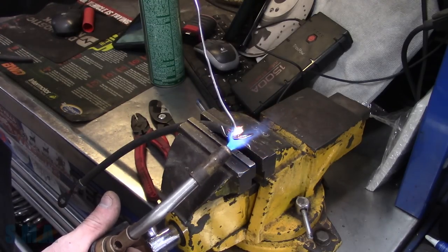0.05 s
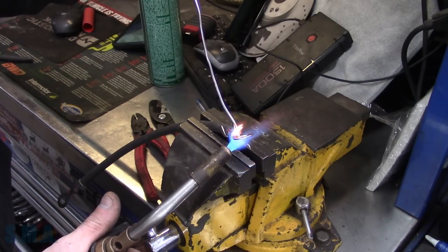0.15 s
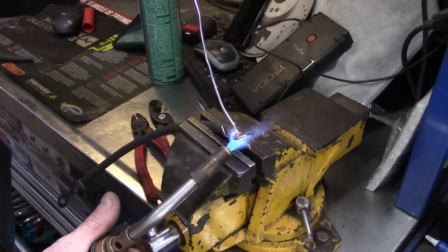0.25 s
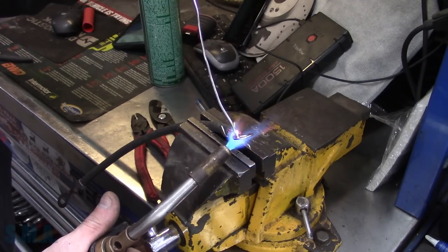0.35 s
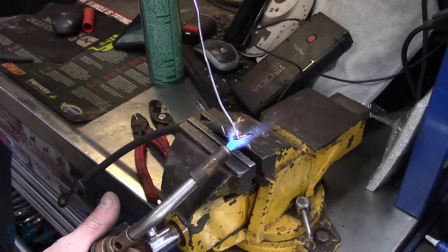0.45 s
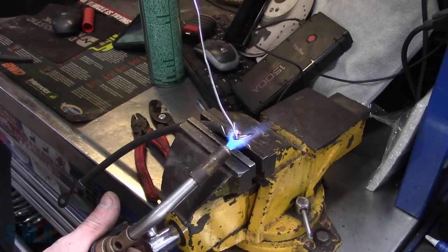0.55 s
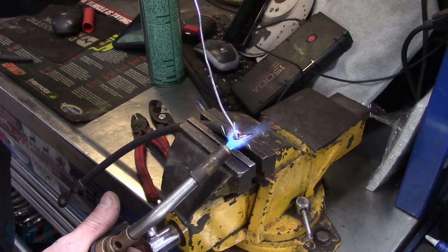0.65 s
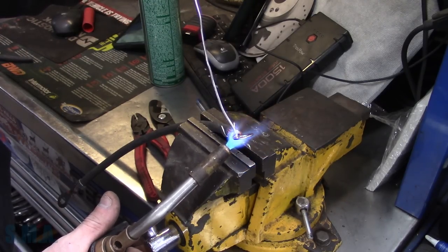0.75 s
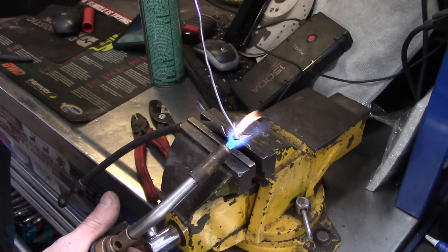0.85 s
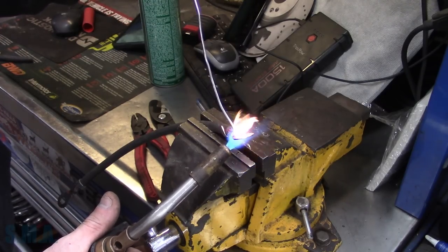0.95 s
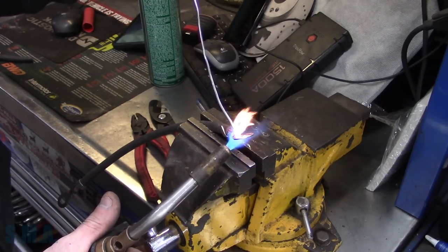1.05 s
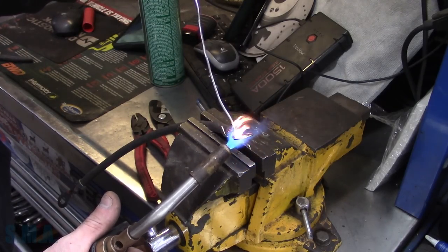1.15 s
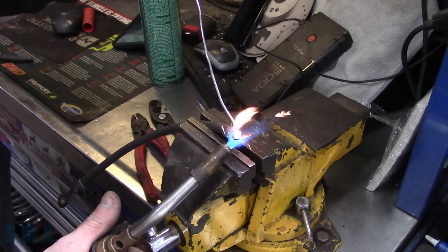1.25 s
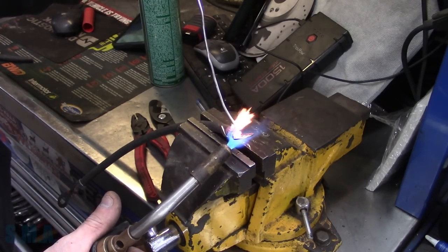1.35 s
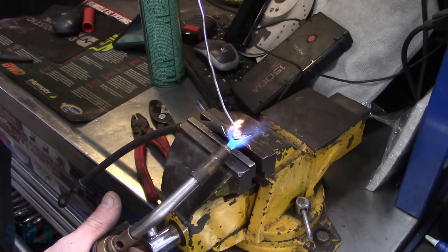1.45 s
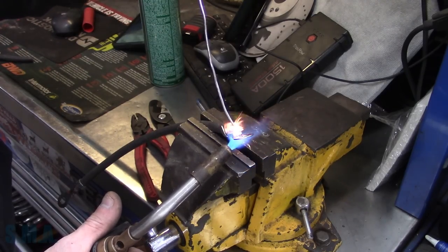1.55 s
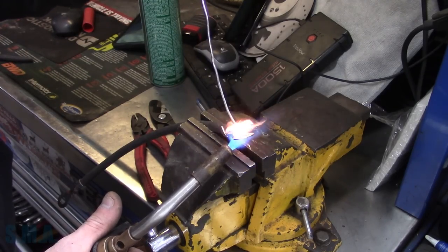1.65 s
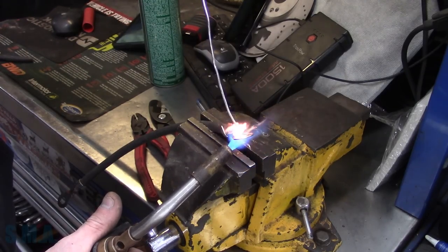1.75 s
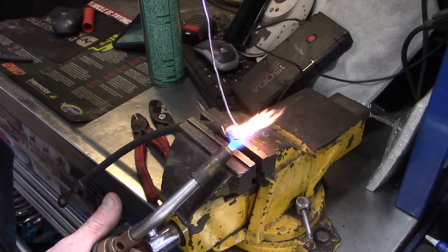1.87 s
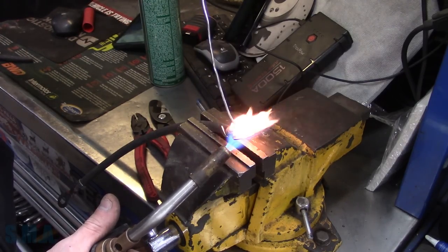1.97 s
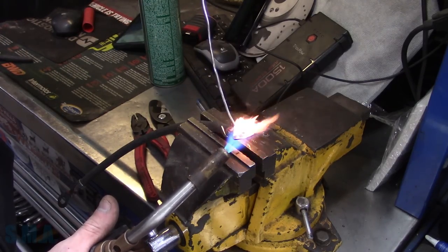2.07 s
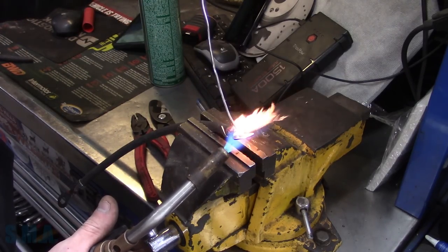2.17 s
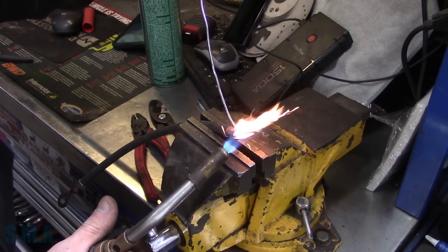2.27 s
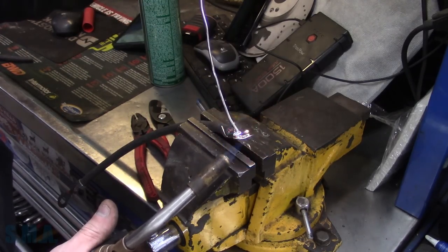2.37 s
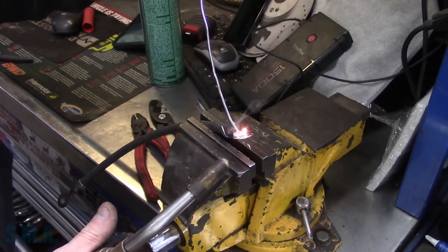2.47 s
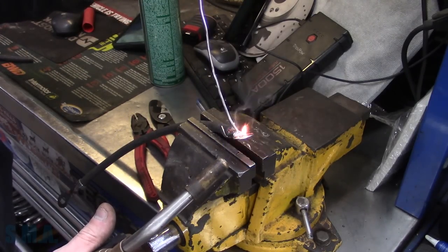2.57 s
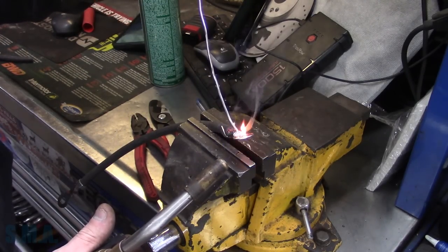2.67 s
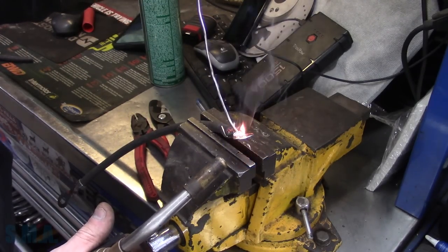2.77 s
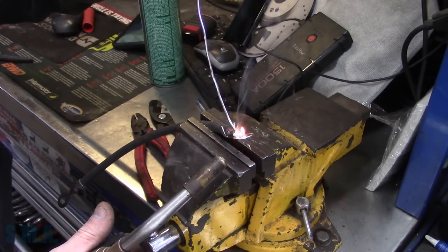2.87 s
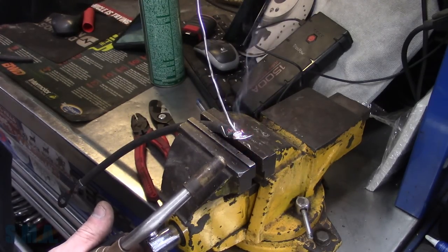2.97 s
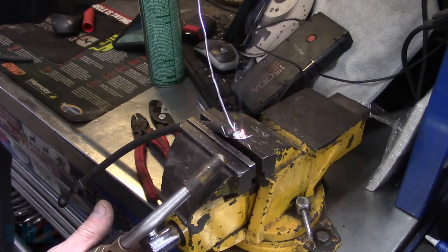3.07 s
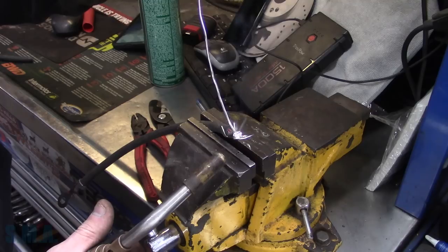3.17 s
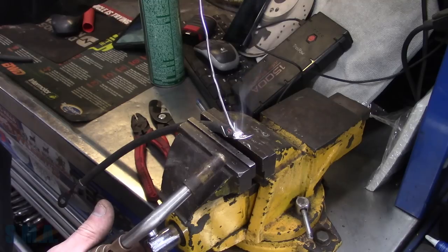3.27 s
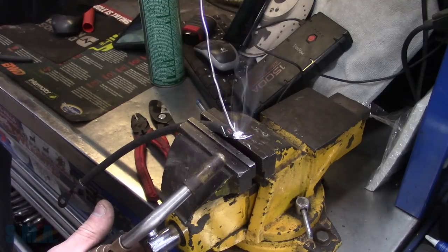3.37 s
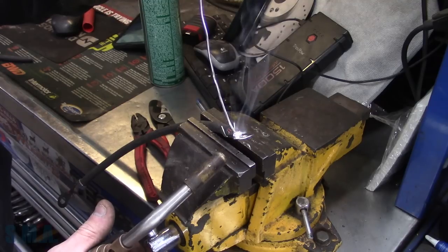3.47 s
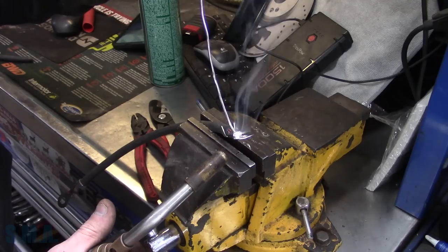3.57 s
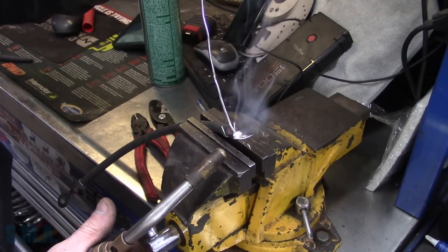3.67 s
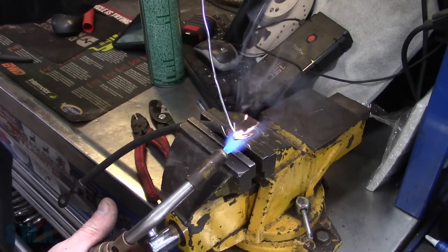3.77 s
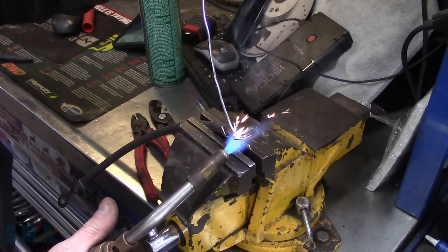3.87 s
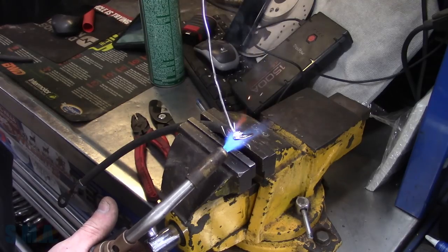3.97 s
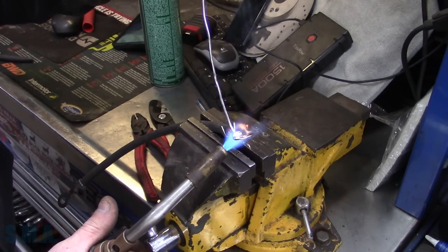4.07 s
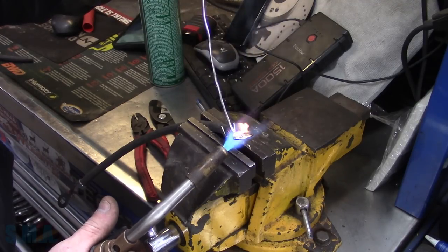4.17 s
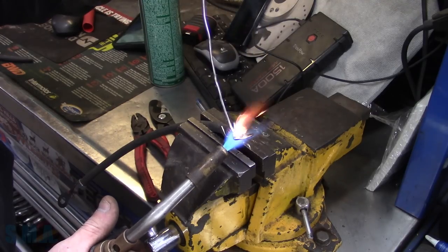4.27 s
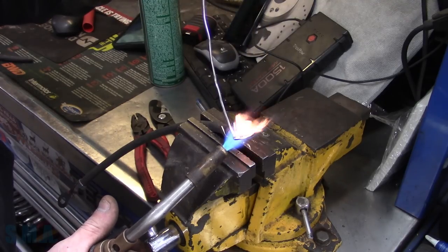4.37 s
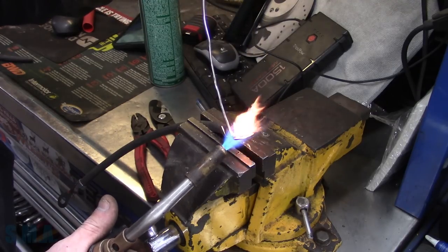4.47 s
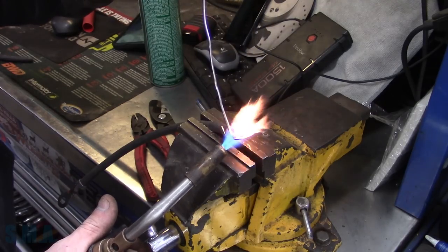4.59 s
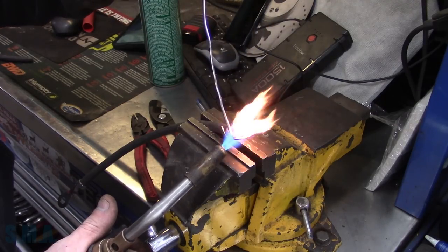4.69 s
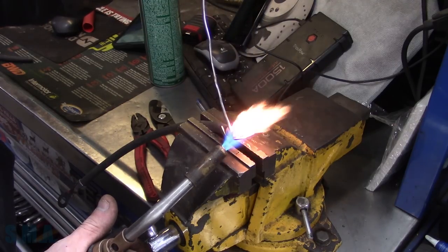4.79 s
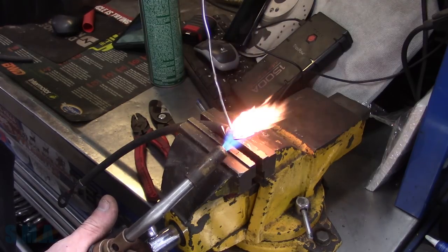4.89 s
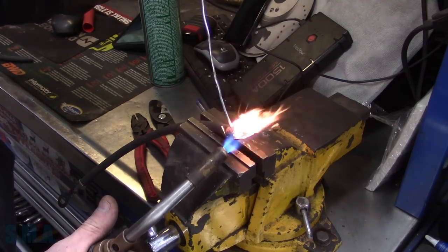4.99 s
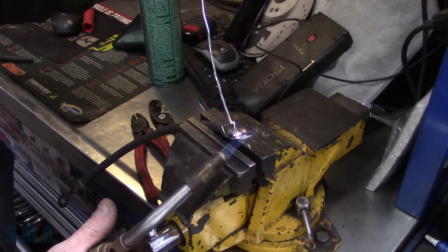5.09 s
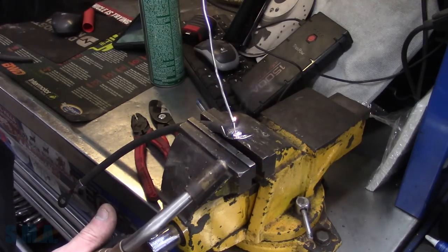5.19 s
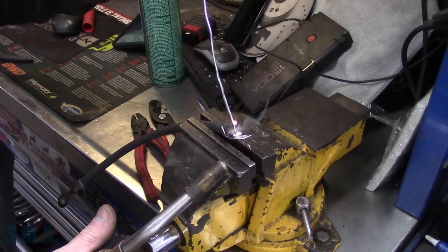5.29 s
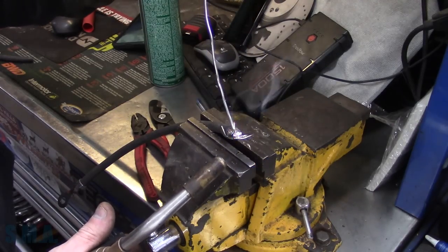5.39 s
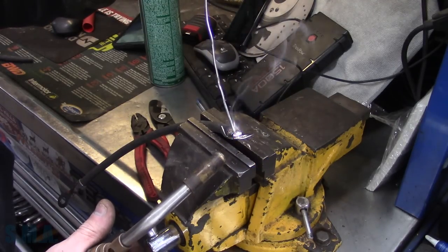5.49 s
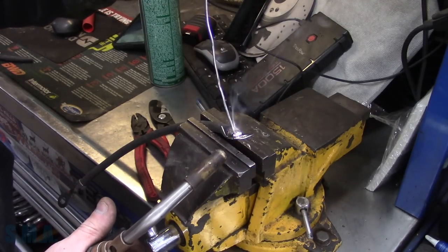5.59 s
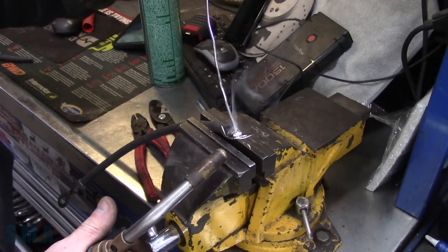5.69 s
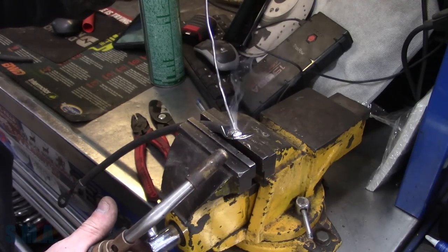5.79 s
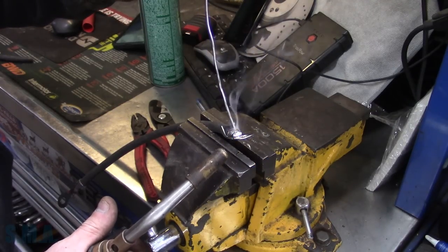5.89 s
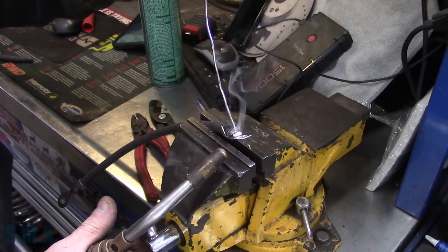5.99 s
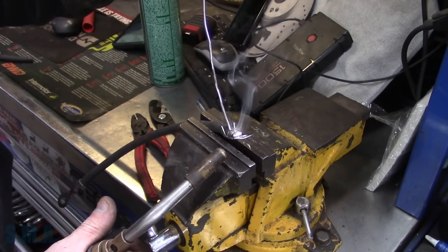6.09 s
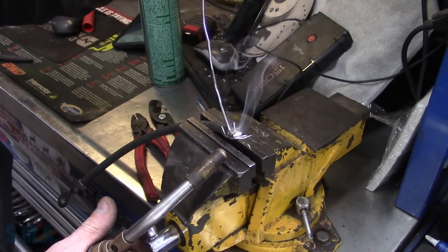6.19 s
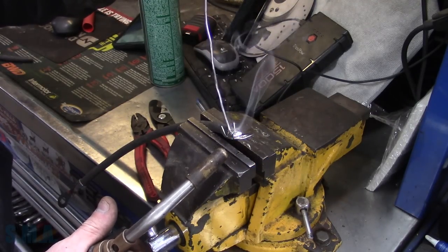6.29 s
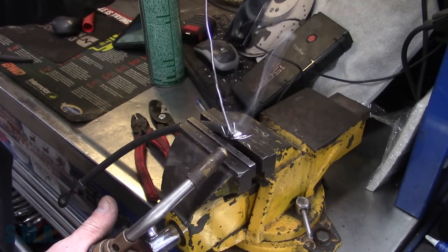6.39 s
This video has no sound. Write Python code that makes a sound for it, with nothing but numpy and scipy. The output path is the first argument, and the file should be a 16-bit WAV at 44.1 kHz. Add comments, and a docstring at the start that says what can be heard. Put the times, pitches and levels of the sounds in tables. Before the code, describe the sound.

A gas hand torch is already burning, close and centred, with a steady, turbulent midrange roar and a hissing rush above it. At about 2.3 seconds it cuts off with a very brief, hollow hoot that rings shortly in the workshop. In the pause, hot flux gives faint, high spits and a fine sizzle, busiest around 3 seconds, with a few barely audible bumps. At 3.6 seconds gas hisses through the tube, and just after 3.7 a sharp igniter snap and a small thump relight the flame. It roars as loudly as before until 5 seconds, then dies with a second, slightly higher hoot. Sparse, tiny crackles follow from 5.3 to 6.1 seconds, then two soft, low bumps. At about 6.4 seconds unlit gas briefly hisses again as the sound ends. A faint hum and dull room noise lie underneath throughout.

```python
"""At a workshop bench, a gas hand torch heats a wire joint held in a vice, in two burns.
The turbulent flame is already roaring; on release it shrinks into the burner tube and hoots.
Gas hisses through the tube, a piezo snap relights it with a thump, and it roars and hoots again.
Bubbles of hot flux crackle in the pauses, and at the end the gas opens once more, unlit.
The room reverberates over a faint hum and a few soft bumps."""
import sys
import numpy as np
from scipy import signal
from scipy.fft import rfft, irfft, next_fast_len
from scipy.io import wavfile

SR = 44100
rng = np.random.default_rng(int(sys.argv[2]) if len(sys.argv) > 2 else 0)


def store_wav(level_fs):
    """Save 16-bit WAV to argv[1]."""
    pcm = np.round(np.clip(np.atleast_2d(level_fs), -1, 1) * 32767)
    wavfile.write(sys.argv[1], SR, pcm.T.astype(np.int16))


N = 284004
TIME = np.arange(N) / SR


def flame(flutter_db=0.72, surge_db=0.44, split_hz=1000, room_colour=0.42):
    """Combustion noise: turbulence radiates a roar and a higher rush. Returns direct sound and room feed."""
    # burns: lit_s, collapse_s, gas_spent_s, roar_db, rush_db
    burns = [(-0.1, 2.262, 2.267, -17, -19), (3.739, 4.992, 5.014, -17.5, -19)]
    # spectrum of the turbulence: frequency_hz, relative_db
    turbulence = [(40, -34), (80, -27), (140, -19.5), (220, -10), (450, -1), (750, 0.5), (1100, -8),
                  (2200, -9.5), (4700, -22), (8500, -29), (12000, -34.5), (15700, -49)]
    # peaks and dips of tube, vice and bench, set by the aim: centre_hz, width_hz, burn_1_db, burn_2_db
    colour = [(149, 26, 5.5, 5), (271, 98, 7.5, 8.0), (342, 52, -5.5, -7), (467, 69, -6.5, -6),
              (552, 14, -4.5, -12.5), (626, 27, -6.5, -3), (752, 15, -15.5, -4.5), (817, 82, 2.5, 4),
              (1002, 24, 5.5, 3.5), (1252, 70, 4.5, 5.5), (1307, 22, -4.5, -8), (1550, 17, 0, -10),
              (1792, 21, -8, -7), (2210, 440, -5, -5.5), (2270, 42, -10.5, -15), (2570, 46, 4.5, 1),
              (2740, 62, -10.5, -3.5), (3177, 155, -7.5, -6.5), (3533, 277, 6, 2), (3850, 66, -6, 2.5),
              (4197, 62, 5.5, 6.5), (4380, 44, 9, 9), (4515, 720, -4.5, -5.5), (5260, 71, 2, -12),
              (6070, 222, 5.5, 5.5), (6862, 473, 8.5, 7), (7800, 140, 3.5, 6), (11770, 417, -3, 0.5),
              (12730, 520, -8, -3.5), (14220, 1400, 7, 6.5)]
    low_pass = signal.butter(2, split_hz, fs=SR, output="sos")
    out = np.zeros((2, N))
    for burn, (lit, collapse, spent, roar_db, rush_db) in enumerate(burns):
        near = noise(turbulence, [(hz, width, db[burn]) for hz, width, *db in colour])
        # summed over all directions, the peaks and dips mostly even out
        around = noise(turbulence, [(hz, width, room_colour * db[burn]) for hz, width, *db in colour])
        eddies = np.array([near, around])
        low = signal.sosfiltfilt(low_pass, eddies)
        roar = rms_one(low) * from_db(roar_db + surge_db * drift(rate_hz=22))
        rush = rms_one(eddies - low) * from_db(rush_db)
        out += roar * gate(lit, collapse, rise_s=0.009, fall_s=0.0063)
        out += rush * gate(lit, spent, rise_s=0.034, fall_s=0.017)
    return out * from_db(flutter_db * drift(rate_hz=50))


def hoot(base_hz=840, waver=0.0178, unsteady_db=3.0, lead_s=0.0045):
    """Thermoacoustic oscillation: as pressure falls, the flame locks onto the tube's lowest mode."""
    # arches of pitch from the dying flame: top_s, top_pitch_hz, level_db
    hoots = [(2.264, 984, -15), (5.008, 1035, -14)]
    out = np.zeros(N)
    for top_s, top_hz, db in hoots:
        hz = base_hz + (top_hz - base_hz) * swell(top_s, 0.027)
        phase = 2 * np.pi * np.cumsum(hz * (1 + waver * drift(rate_hz=300))) / SR
        level = from_db(db + unsteady_db * drift(rate_hz=150)) * swell(top_s - lead_s, 0.031)
        out += np.sqrt(2) * np.sin(phase) * level
    return out


def unlit_gas():
    """Jet noise: the hiss of bare gas is filtered by the resonances of the cold tube."""
    # valve openings: start_s, stop_s, rise_s, level_db
    openings = [(3.617, 3.744, 0.024, -31), (6.367, 6.5, 0.034, -33)]
    # spectrum of the jet: frequency_hz, relative_db
    jet = [(200, -25.5), (700, -22.5), (1500, -19), (2800, -22.5), (4200, -13.5), (5200, -20.5),
           (6300, -10), (7600, -11.5), (8600, -18.5), (12000, -24), (15500, -30)]
    # tube resonances: centre_hz, width_hz, gain_db
    resonances = [(1000, 420, 17), (2170, 280, 11.5), (3385, 260, 11.5), (4490, 320, 6), (5820, 280, 8),
                  (6520, 390, 13), (7597, 330, 9.5), (9080, 280, 7.5), (10050, 300, 4.5), (11260, 350, 8),
                  (12070, 350, 6.5)]
    flow = sum(from_db(db) * gate(start, stop, rise, fall_s=0.0037) for start, stop, rise, db in openings)
    return flow * noise(jet, resonances)


def piezo_snap(crack_db=-7, scatter_db=-25, top_hz=10000):
    """Impact excitation: the hammer rings the igniter's modes, and its crack scatters off the bench."""
    # hammer blows: time_s, relative_db
    snaps = [(3.7351, 2.5), (3.7362, -10), (3.7371, -3.5)]
    # igniter modes: pitch_hz, gain_db, t60_s
    modes = [(1444, -10, 0.0084), (3730, -9, 0.0068), (4700, -14, 0.007), (6900, -17.5, 0.008),
             (8900, -18, 0.007), (10410, -7.5, 0.0082), (14000, -21.5, 0.005)]
    blows = clicks(snaps)
    crack = from_db(crack_db) * bursts(blows, decay_s=0.00068)
    scatter = from_db(scatter_db) * bursts(blows, decay_s=0.0095)
    low_pass = signal.butter(2, top_hz, fs=SR, output="sos")
    return ring(blows, modes) + signal.sosfilt(low_pass, crack + scatter)


def gas_thump(low_hz=110):
    """Sudden expansion: gas catches at the nozzle; so small a source radiates little deep bass."""
    # pops, on relighting and faintly after each burn: time_s, relative_db
    pops = [(2.617, -36), (3.7396, 1.5), (5.3343, -25)]
    # modes of a pop: pitch_hz, gain_db, t60_s
    modes = [(280, -5.5, 0.078), (480, -1.5, 0.0066), (850, -9.5, 0.01), (2320, -13.5, 0.0054)]
    high_pass = signal.butter(2, low_hz, "high", fs=SR, output="sos")
    return signal.sosfilt(high_pass, ring(clicks(pops), modes))


def flux(spit_db=-5.5, sizzle_db=-61, spread_db=3.0, rest_per_s=5):
    """Shot noise: tiny flux bubbles burst at random on the hot joint, among a few louder spits."""
    # spits: time_s, relative_db
    spits = [(2.4703, -43), (2.5346, -41), (2.609, -46), (2.6424, -49), (2.7911, -47), (2.8918, -49.5),
             (2.9667, -49), (3.0194, -46), (3.0435, -50), (3.2465, -59), (3.3253, -50), (3.4414, -56),
             (5.2505, -43), (5.3338, -42), (5.5348, -46.5), (5.5618, -51.5), (5.5857, -53.5), (6.0467, -49),
             (6.099, -48.5)]
    # sizzle as the joint settles after the first burn: busiest_s, half_width_s, extra_per_s
    sizzle = (3.05, 0.4, 150)
    # spectrum of a burst: frequency_hz, gain_db
    spectrum = [(1500, -28), (4000, -18.5), (6600, 3), (7800, 2), (9000, 4.5), (11000, 1.5), (13000, -10),
                (16000, -12)]
    busiest_s, half_width_s, extra_per_s = sizzle
    per_s = rest_per_s + extra_per_s * swell(busiest_s, half_width_s)
    bubbles = (rng.random(N) < per_s / SR) * from_db(sizzle_db + spread_db * rng.standard_normal(N))
    blows = from_db(spit_db) * clicks(spits) + bubbles
    return coloured(bursts(blows, decay_s=0.0011), spectrum)


def with_echo(x, delay_s=0.01144, echo_db=-18.5, top_hz=4000):
    """Comb filtering: one dull reflection from a near surface ripples the direct sound's spectrum."""
    dull = signal.sosfiltfilt(signal.butter(1, top_hz, fs=SR, output="sos"), x)
    return x + from_db(echo_db) * np.interp(TIME - delay_s, TIME, dull, left=0)


def reverberation(x, first_echo_s=0.0066):
    """Diffuse field: dense echoes decay exponentially in octave bands, the treble dying first."""
    # decay of the workshop: frequency_hz, t60_s
    decay_times = [(150, 1.07), (400, 0.57), (1000, 1.0), (2800, 0.72), (7000, 0.65), (15000, 0.2)]
    # strength of its reverberation: frequency_hz, gain_db
    gains = [(100, -15), (300, -12.5), (800, -9), (2000, -12.5), (7000, -17.5), (15000, -25)]
    t, hz = TIME[:SR], np.arange(SR // 2 + 1.0)
    echoes, response = rfft(rng.standard_normal(SR)), np.zeros(SR)
    for centre in 62.5 * 2 ** np.arange(9):
        share = np.clip(1 - np.abs(np.log2((hz + 1) / centre)), 0, 1)
        fade = np.exp(-np.log(1000) * t / at_hz(decay_times, centre)) * (t > first_echo_s)
        fade /= np.sqrt(np.sum(fade ** 2))
        response += irfft(echoes * share, SR) * fade * from_db(at_hz(gains, centre))
    return signal.fftconvolve(x, response)[:N]


def bumps():
    """Amplitude modulation: low noise swells softly, as of a hand shifting on the bench."""
    # bumps: time_s, half_width_s, level_db
    swells = [(2.933, 0.0061, -58), (3.005, 0.0063, -55.5), (3.376, 0.0082, -55), (6.13, 0.0256, -52),
              (6.228, 0.045, -52)]
    # spectrum of a bump: frequency_hz, relative_db
    spectrum = [(60, -30.5), (140, -21), (200, -2.5), (270, -4), (380, -21), (800, -22), (4000, -47)]
    return noise(spectrum) * sum(from_db(db) * swell(s, width) for s, width, db in swells)


def hum(wander_rad=0.4):
    """Line spectrum: mains hum and faint steady tones, each wandering in phase."""
    # tones of the workshop: pitch_hz, rms_db
    tones = [(119, -66), (479, -77), (1590, -76.5)]
    return sum(from_db(db) * np.sqrt(2) * np.sin(2 * np.pi * hz * TIME + wander_rad * drift(rate_hz=9.7))
               for hz, db in tones)


def room_noise(level_db=-56):
    """Stationary noise: the dull, steady floor of the workshop."""
    # ambient spectrum: frequency_hz, relative_db
    spectrum = [(25, 2.5), (60, -14), (100, -9), (190, -4), (265, 2), (340, -4), (470, -2), (580, -6.5),
                (760, -5.5), (1100, -11.5), (1900, -15), (4500, -20.5), (8800, -28), (16000, -35)]
    return from_db(level_db) * noise(spectrum)


def from_db(db):
    """Decibels to amplitude ratio."""
    return 10 ** (np.asarray(db) / 20)


def rms_one(x):
    """Normalisation to rms 1."""
    return x / np.sqrt(np.mean(x ** 2) + 1e-20)


def at_hz(points, hz):
    """Interpolation on a log-frequency axis."""
    knots, values = np.transpose(points)
    return np.interp(np.log(hz + 1), np.log(knots), values)


def coloured(x, spectrum, peaks=()):
    """Spectral shaping by a broad curve with bell-shaped peaks and dips on it."""
    size = next_fast_len(N + SR // 10)
    hz = np.arange(0, SR / 2, 2.0)
    peaks_db = sum(db * np.exp(-2 * ((hz - centre) / width) ** 2) for centre, width, db in peaks)
    gain = np.interp(np.arange(size // 2 + 1) * SR / size, hz, from_db(at_hz(spectrum, hz) + peaks_db))
    return irfft(rfft(x, size) * gain, size)[:N]


def noise(spectrum, peaks=()):
    """Coloured Gaussian noise of rms 1."""
    return rms_one(coloured(rng.standard_normal(N), spectrum, peaks))


def drift(rate_hz):
    """Random modulation: straight lines between Gaussian values of spread 1."""
    knots = rng.standard_normal(N // 40)
    return np.interp(TIME * rate_hz, np.arange(len(knots)), knots)


def clicks(rows):
    """One impulse for each row of time_s, level_db."""
    out = np.zeros(N)
    for s, db in rows:
        out[int(round(s * SR))] += from_db(db)
    return out


def ring(blows, modes):
    """Modal superposition: each blow sets all modes ringing as damped sines."""
    out = np.zeros(N)
    for hz, db, t60 in modes:
        radius, angle = from_db(-60 / (t60 * SR)), 2 * np.pi * hz / SR
        feedback = [1, -2 * radius * np.cos(angle), radius * radius]
        out += from_db(db) * signal.lfilter([0, np.sin(angle)], feedback, blows + 1e-18)
    return out


def bursts(blows, decay_s):
    """Each blow releases an exponentially decaying puff of white noise."""
    pole = np.exp(-1 / (decay_s * SR))
    return signal.lfilter([1], [1, -pole], blows + 1e-18) * rng.standard_normal(N)


def gate(start_s, stop_s, rise_s, fall_s):
    """Envelope with a smooth rise, a hold and an exponential fall."""
    rise = np.sin(np.pi / 2 * np.clip((TIME - start_s) / rise_s, 0, 1))
    return rise * np.exp(-np.clip((TIME - stop_s) / fall_s, 0, 20))


def swell(centre_s, half_width_s):
    """Gaussian envelope of height 1."""
    return np.exp(-((TIME - centre_s) / half_width_s) ** 2)


def scene(ambience_side_db=-9.0, tube_to_room_db=-4.0):
    """Mid-side stereo: the torch is straight ahead and narrow; reverberation and room noise are wider."""
    # stereo width of the flame: frequency_hz, side_db
    flame_width = [(40, -18), (100, -31.5), (250, -40), (700, -45), (1500, -37), (2500, -38), (5000, -26.5),
                   (9000, -32.5), (15000, -30)]
    # stereo width of the reverberation: frequency_hz, side_db
    room_width = [(60, -11.5), (200, -24.5), (400, -24), (700, -35), (1300, -23), (2400, -23.5),
                  (4400, -14.5), (8000, -6.5), (15000, -19)]
    flame_near, flame_around = flame()
    tube = hoot() + unlit_gas()
    transients = piezo_snap() + gas_thump() + flux()
    direct = with_echo(flame_near) + tube + transients
    radiated = flame_around + from_db(tube_to_room_db) * tube + transients
    mid = direct + reverberation(radiated) + room_noise() + hum() + bumps()
    side = coloured(flame_around, flame_width) + coloured(reverberation(radiated), room_width)
    side += from_db(ambience_side_db) * room_noise()
    return np.array([mid + side, mid - side])


def record(dry, low_hz=75, top_hz=15700, ceiling=0.82):
    """Band limiting and saturation: the microphone drops deep bass, peaks are rounded, the top is cut."""
    thin = signal.sosfilt(signal.butter(3, low_hz, "high", fs=SR, output="sos"), dry)
    rounded = thin / (1 + (thin / ceiling) ** 8) ** (1 / 8)
    return signal.sosfilt(signal.ellip(10, 0.1, 80, top_hz, fs=SR, output="sos"), rounded)


dry = scene()
out = record(dry)
store_wav(out)
```